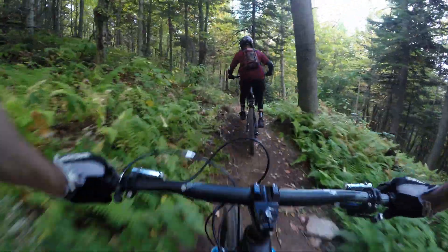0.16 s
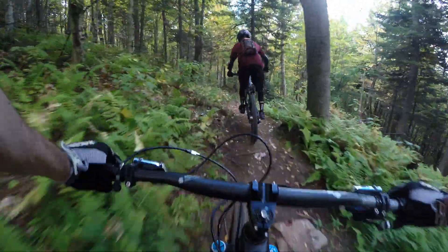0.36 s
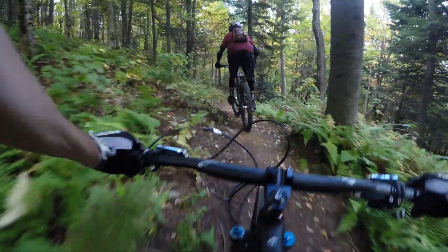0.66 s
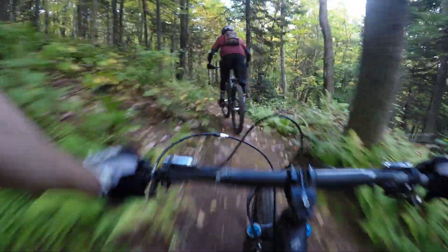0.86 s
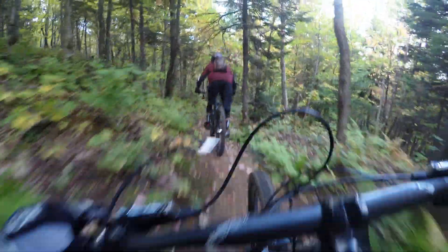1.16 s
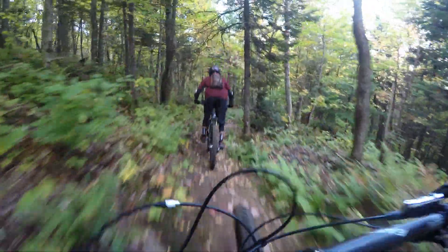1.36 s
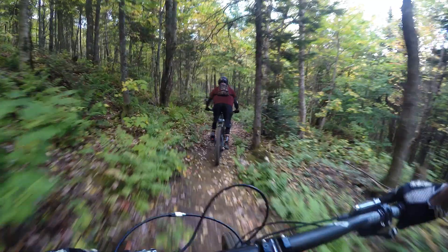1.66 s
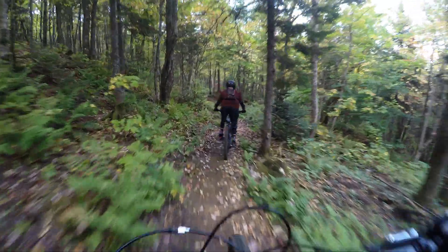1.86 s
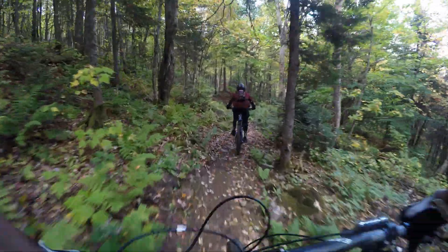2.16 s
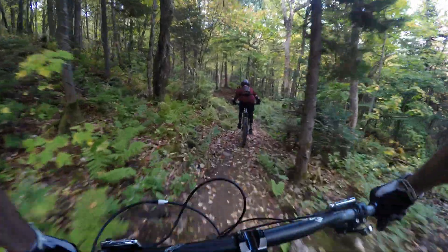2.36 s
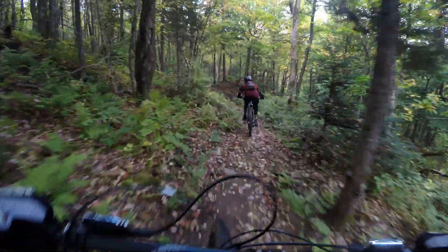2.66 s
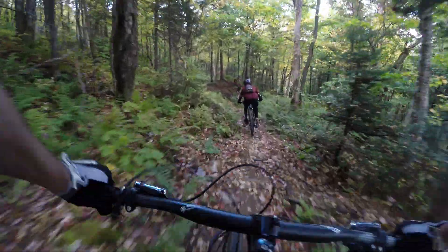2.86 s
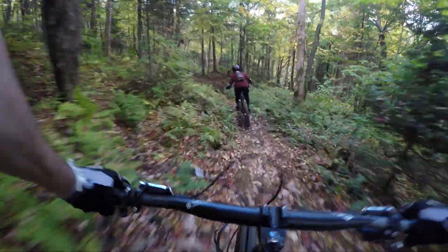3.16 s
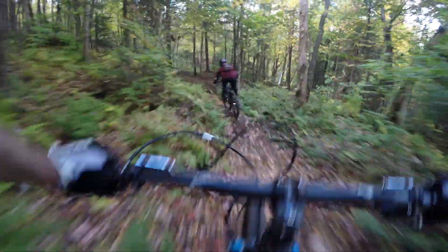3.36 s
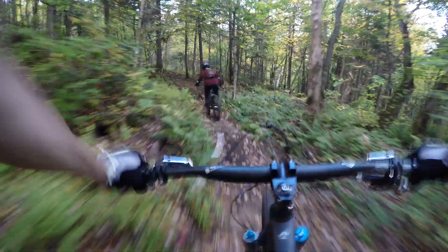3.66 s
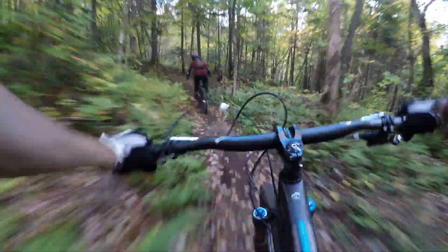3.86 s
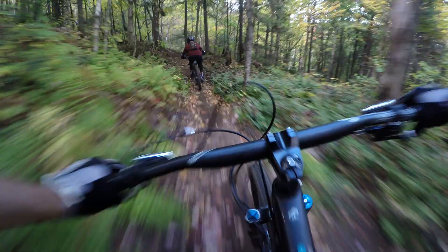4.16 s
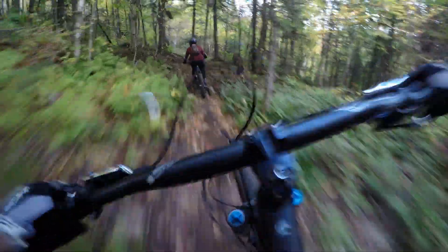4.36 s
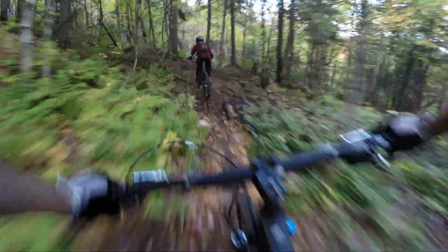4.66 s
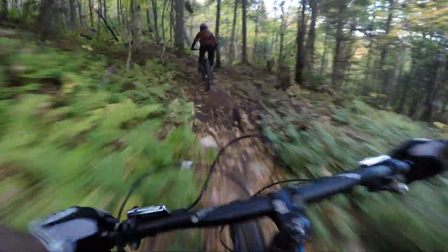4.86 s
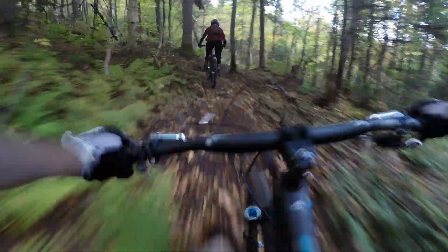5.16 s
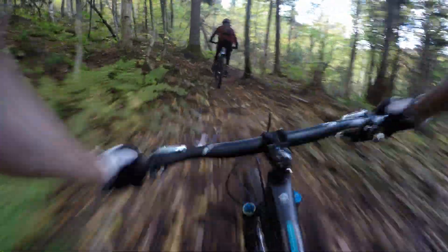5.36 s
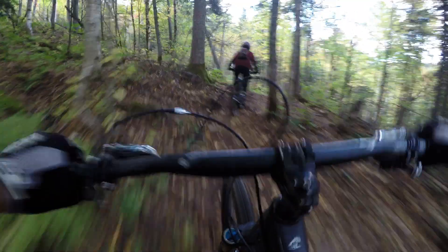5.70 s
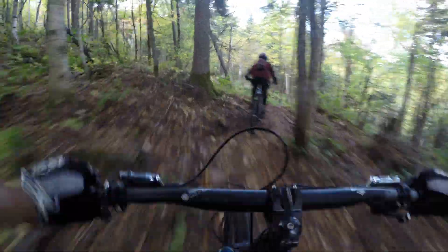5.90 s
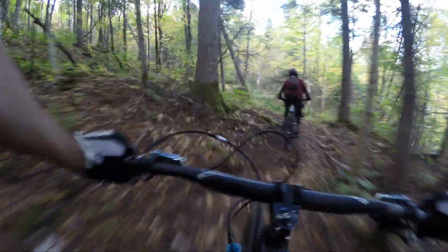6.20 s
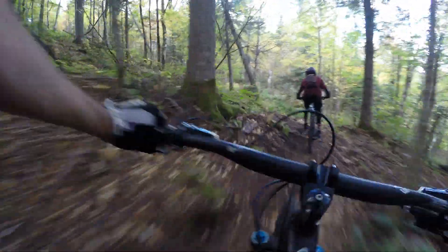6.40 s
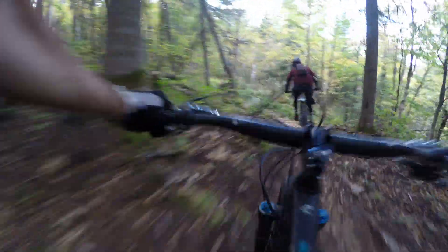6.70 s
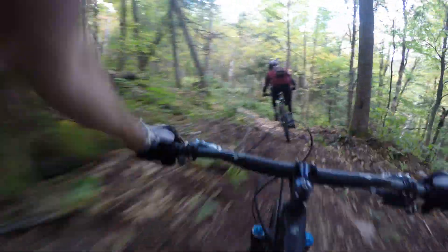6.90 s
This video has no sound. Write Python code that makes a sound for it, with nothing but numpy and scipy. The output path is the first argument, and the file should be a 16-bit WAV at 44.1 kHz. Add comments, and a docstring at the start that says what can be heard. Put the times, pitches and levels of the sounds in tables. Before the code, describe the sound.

A mountain bike rattles down a leafy dirt trail, tyres crunching and frame knocking, with wind and thumps on the microphone.

```python
"""On a leafy dirt trail, a mountain bike runs downhill, heard from a camera on the rider's chest.
The tyres crunch over grit and leaves, and rocks and roots knock the frame.
Jolts thump the camera and wind buffets its microphone. Chain, cables and pebbles tick,
and oil swishes through the damper (the shock absorber in the front fork) on deep strokes."""
import sys
import numpy as np
from scipy import signal
from scipy.fft import rfft, irfft, next_fast_len
from scipy.io import wavfile
from scipy.ndimage import uniform_filter1d, map_coordinates

SR = 44100
rng = np.random.default_rng(int(sys.argv[2]) if len(sys.argv) > 2 else 0)


def digitize_waveform(pressure):
    """Quantize a signal to 16-bit integers and store it at the path in sys.argv[1].

    Rows of a 2-D input are taken as channels; values are limited to [-1, 1].
    """
    field = np.atleast_2d(pressure).T
    bounded = np.clip(field, -1, 1)
    quanta = np.round(bounded * 32767).astype(np.int16)
    wavfile.write(sys.argv[1], SR, quanta)


N = 310464
HIGHEST_HZ = 15600
SCRAPE_S = .016  # a part scrapes for this long before it hits

# How hard the tyres work the ground. Each row: time in seconds, grit level in dB, leaf level in dB.
TYRE_LEVELS = [(0, -43, -55), (1.05, -43.5, -56), (1.25, -45.5, -59.5), (1.8, -44, -53),
               (2.5, -41.5, -51.5), (2.9, -42, -45), (3.47, -38, -49), (3.53, -31.5, -38.5),
               (3.9, -33, -45), (4.1, -25, -34), (4.15, -30.5, -42), (4.46, -36, -44.5), (4.87, -29.5, -39),
               (5.1, -35.5, -43.5), (5.27, -32.5, -45.5), (5.7, -38, -44.5), (6.22, -34.5, -42),
               (6.55, -40, -51), (7.04, -34, -49)]
# Patches of loose leaves and gravel. Each row: start in seconds, hold in seconds, leaf level in dB.
LOOSE_PATCHES = [(.155, 0.046, -46), (.355, .03, -50), (.855, 0.018, -48), (.93, 0.024, -47),
                 (1.355, 0.052, -48), (2.385, 0.038, -43.5), (2.67, 0.022, -44.5), (2.77, 0.077, -43.5),
                 (2.88, 0.034, -40.5), (3.25, 0.055, -42), (3.695, 0.068, -43), (3.945, 0.029, -34.5),
                 (4.075, 0.016, -38), (5.0, 0.036, -39.5), (5.235, 0.043, -35.5), (5.37, 0.035, -42),
                 (5.765, 0.041, -41), (5.87, 0.067, -42), (6.69, 0.053, -38), (6.94, 0.023, -39)]
# The tone of grit and of dry leaves. Each row: frequency in Hz, relative strength in dB.
GRIT_TONE = [(150, 11), (400, 7), (520, 6.5), (720, -1), (930, 0.5), (1250, 0), (1750, 0), (2300, -4),
             (3100, -2.5), (4900, -12.5), (6200, -13.5), (15000, -62)]
LEAF_TONE = [(1500, -32), (4000, 1.5), (6000, -5), (8000, -4), (10000, -5.5), (13000, -5.5), (15500, -16)]
# The notes that spokes and brake discs ring at. Each row: pitch in Hz, width in Hz, strength in dB.
WHEEL_NOTES = [(894, 22, 1.5), (966, 8.3, 15), (1406, 56, -10), (1742, 23, 11), (1890, 33, -2),
               (2650, 40, 9), (3080, 30, -11.5)]


def tyres():
    """Tyre knobs crush grit and dry leaves: a rush of small snaps that also sets the wheels ringing."""
    grit_db, leaves_db = curves(TYRE_LEVELS)
    patches = swells(LOOSE_PATCHES, rise_s=.0055, fall_s=.012)
    grit_gain = np.hypot(amp(grit_db), amp(3.5) * patches)  # patches stir up grit too
    leaf_gain = np.hypot(amp(leaves_db + .45 * wobble(35)), patches)
    bumps = amp(1.4 * wobble(45))
    clumps = amp(4.5 * wobble(140))  # one knob after another breaks something
    stones = unit(clumps * grains(per_s=1200, pitch_hz=2796, spread=.6, cycles=2.4, scatter_db=1))
    crackle = unit(clumps * grains(per_s=900, pitch_hz=8000, spread=.4, cycles=1.2, scatter_db=4))
    crunch = rng.standard_normal(N) + .5 * stones
    grit = patchy(coloured(crunch, GRIT_TONE), depth_db=2) * amp(1.3 * wobble(70))
    # A breaking leaf or stem gives a sharp snap that dies at once.
    breaks_per_s, break_fall_s = 110, .0015
    snaps = (rng.random(N) < breaks_per_s / SR) * rng.random(N) ** 2
    breaks = signal.lfilter([1], [1, -np.exp(-1 / (break_fall_s * SR))], snaps)
    rustle = rng.standard_normal(N) * (1 + amp(11.5) * breaks) + .7 * crackle
    leaves = patchy(coloured(rustle, LEAF_TONE), depth_db=2) * amp(1.2 * wobble(110))
    ringing = unit(filtered(crunch * amp(4 * wobble(35)), lambda f: body(WHEEL_NOTES, f)))
    ring_gain = amp(5.5) * grit_gain ** 1.49
    return bumps * (grit_gain * grit + leaf_gain * leaves + ring_gain * ringing)


# The notes that the frame rings at. Each row: pitch in Hz, width in Hz, strength in dB.
FRAME_NOTES = [(348, 120, 1), (476, 160, 10.5), (980, 480, 1.5), (1300, 300, -8.5), (1756, 460, 4),
               (2750, 510, 4), (3640, 600, 1), (4650, 760, 3)]
# Hits on rocks and roots. Each row: time in seconds, level in dB, brightness in Hz (higher is harder),
# breadth as a ratio (small sounds hollow), contact in seconds (long for a glancing blow).
TRAIL_HITS = [(0.348, -41, 1800, 1.1, .01), (0.595, -17.5, 1290, 1.7, 0.017),
              (0.731, -31.5, 2480, 1.6, 0.033), (0.937, -33.5, 1800, 1.9, 0.027),
              (1.08, -31.5, 2400, 0.74, .04), (1.359, -43, 3250, 0.032, 0.15),
              (1.559, -31, 2870, 0.3, 0.019), (2.17, -33, 3080, 0.13, .025), (2.908, -27, 1100, 0.52, .02),
              (2.936, -24, 800, 0.31, 0.008), (3.083, -26, 850, 0.5, 0.027),
              (3.209, -31, 2400, 0.68, 0.022), (3.232, -18.5, 1090, 0.29, 0.022),
              (3.388, -29, 3170, 0.18, 0.022), (3.403, -25, 750, 0.44, 0.015),
              (3.509, -16.5, 1970, 0.13, 0.0088), (3.533, -26.5, 3200, 1.4, .014),
              (3.609, -15, 2590, 0.83, 0.023), (3.706, -23, 1790, 1.3, 0.049),
              (3.852, -17.5, 646, 0.49, 0.026), (3.95, -19.5, 800, 0.49, 0.017),
              (3.963, -25, 2600, 0.98, 0.027), (3.994, -27.5, 3600, 1.3, 0.014),
              (4.025, -20.5, 1900, 0.85, .035), (4.037, -18, 2300, 1, 0.013),
              (4.05, -19.5, 2690, 0.98, 0.015), (4.077, -25.5, 3800, 0.51, 0.082),
              (4.112, -24.5, 2600, .4, 0.032), (4.13, -14.5, 2300, 0.85, 0.011),
              (4.194, -26.5, 2180, 0.39, 0.014), (4.301, -25.5, 2940, 1.1, 0.013),
              (4.849, -23, 2700, 1.6, 0.046), (5.229, -27.5, 2500, 1.1, .016),
              (5.266, -24, 2200, 0.67, 0.017), (5.389, -26, 2900, 0.93, 0.034),
              (5.572, -17, 3260, 1.4, 0.038), (5.576, -8.5, 680, 0.91, 0.0087),
              (5.617, -23, 2920, 1.8, 0.031), (5.656, -17, 1310, 0.61, 0.038),
              (5.672, -13, 2600, 1.9, 0.019), (5.678, -30, 3500, 1.1, 0.016), (6.043, -27, 1200, 1.3, .014),
              (6.159, -28.5, 2210, 0.22, 0.021), (6.181, -30, 2580, 1.1, .02),
              (6.228, -27.5, 1630, 0.35, 0.025)]


def frame_knocks():
    """Rocks and roots knock through the wheels into the frame: a hollow clack, then a dull shudder."""
    out, t = np.zeros(N), np.arange(SR // 3) / SR
    shudder_db, shudder_fade_s, shudder_top_hz = -19.5, .42, 450
    for start, db, top_hz, breadth, contact_s in TRAIL_HITS:
        tune = np.exp(.05 * rng.standard_normal())  # each knock has a slightly different pitch
        frame = lambda f: sum(amp(note_db) * resonance(f, tune * hz, width)
                              for hz, width, note_db in FRAME_NOTES)
        bike = lambda f: frame(f) + amp(-12) * body(WHEEL_NOTES, f)
        blow = 6 * .014 / contact_s  # a shorter contact gives a cleaner blow
        clack = strike(bike, top_hz, breadth, blow, contact_s, chatter_db=-14, chatter_s=.07)
        shudder = noise(len(t), lambda f: bike(f) / (1 + 1j * f / shudder_top_hz))
        add(out, start - SCRAPE_S, amp(db) * clack)
        add(out, start, amp(db + shudder_db) * fade(t, shudder_fade_s) * shudder)
    return out


# Jolts to the camera. Each row: start in seconds, swing level in dB, slap in dB relative to the swing.
CAMERA_JOLTS = [(0.262, -17.5, -12), (0.295, -12.5, -26), (0.342, -12, -20), (0.505, -9, -40),
                (0.524, -3, -33), (0.61, -4.5, -17.5), (0.924, -10.5, -17), (0.975, -6.5, -43),
                (1.15, -11, -35), (1.308, -2, -30), (1.847, -10, -40), (2.199, -1, -18.5),
                (2.436, -4.5, -8.5), (2.543, -8, -5.5), (2.562, -4.5, -10), (2.641, -3.5, -9),
                (2.818, -1.5, -29), (3.079, -7, -4.5), (3.123, -2.5, -7.5), (3.155, -2, -11.5),
                (3.267, -8, -8), (3.427, -5.5, -13), (3.651, -2.5, -7), (3.822, -10.5, -2),
                (3.935, -8, -2.5), (4.124, -1.5, -1), (4.525, -16, -4), (4.591, -0.5, -23),
                (4.798, -5.5, -7), (4.837, -4.5, -4.5), (4.873, -13, 5), (4.913, -7.5, -3), (5.265, -6, -2),
                (5.287, -2.5, -9.5), (5.576, -8, 1.5), (5.794, -13, -11), (5.879, -2, -13.5),
                (5.926, -4.5, -21), (6.023, -8.5, -16), (6.055, -2, -19), (6.114, -3.5, -13),
                (6.227, -6.5, -11.5), (6.258, -6.5, -12.5), (6.35, -3, -17), (6.411, -1, -8.5),
                (6.616, 0, -10), (6.802, -2, -12.5)]


def camera_jolts():
    """Each jolt swings the camera on its strap: a deep, short thump that starts with a dull slap."""
    out, t = np.zeros(N), np.arange(SR // 6) / SR
    swing_hz = 44.1
    swing = np.sin(2 * np.pi * swing_hz * t) * fade(t, seconds=.12)
    for start, db, slap_db in CAMERA_JOLTS:
        slap_hz = max(237.6 + 8 * slap_db, swing_hz)  # a harder slap sounds higher
        rub = rng.standard_normal(len(t)) * fade(t, seconds=.039)
        slap = filtered(rub, lambda f: resonance(f, slap_hz, 1.4 * slap_hz) ** 3)
        add(out, start, amp(db) * (swing + amp(slap_db) * slap / np.abs(slap).max()))
    return out


# Air and body shake, growing as the bike gathers speed. Each row: time in seconds, level in dB.
RUMBLE_LEVELS = [(0, -32.5), (.55, -25.5), (.8, -24), (.95, -23), (1.42, -25), (1.78, -28), (2.3, -20),
                 (2.75, -22.5), (3.15, -9.5), (3.52, -21.5), (3.7, -13), (4.4, -15.5), (4.9, -14),
                 (5.05, -20.5), (5.35, -14), (5.7, -19), (6.25, -18), (6.52, -18), (7.04, -14.5)]
# Gusts that break over the microphone. Each row: start in seconds, hold in seconds, level in dB.
WIND_GUSTS = [(.92, 0.041, -32.5), (2.2, 0.064, -42), (2.54, 0.044, -39), (2.895, 0.081, -16.5),
              (3.01, 0.025, -27.5), (3.195, 0.097, -20), (3.33, 0.0089, -23), (3.385, 0.068, -19),
              (3.61, 0.039, -19.5), (3.82, 0.063, -19), (3.9, 0.071, -25.5), (4.025, 0.12, -22),
              (4.205, 0.0051, -23), (4.825, 0.068, -20), (5.26, 0.037, -22.5), (5.565, 0.019, -19),
              (5.635, 0.042, -25.5), (5.775, 0.076, -37), (5.87, 0.038, -32), (6.02, 0.027, -30.5),
              (6.116, 0.012, -19), (6.19, 0.053, -30), (6.355, 0.083, -21.5), (7.005, 0.048, -25)]
# The tone of the wind's three layers. Each row: frequency in Hz, relative strength in dB.
SHAKE_TONE = [(8, -27), (20, -1.5), (29, 3), (50, -2.5), (80, -7.5), (120, -18.5), (200, -30), (400, -49),
              (1000, -120)]
SWIRL_TONE = [(50, -13), (100, -2), (150, -2.5), (240, 2), (350, -4.5), (500, -13.5), (700, -22),
              (1100, -38.5), (2500, -37.5), (8000, -55)]
ROAR_TONE = [(40, -2), (90, 19), (150, 16.5), (240, 1), (420, 0), (620, -2.5), (900, -21), (1600, -52),
             (5000, -80)]


def wind():
    """Air buffets the microphone: a deep shake, lumpy swirls and a rough roar in strong gusts."""
    rumble_db, = curves(RUMBLE_LEVELS)
    breeze = amp(1.124 * rumble_db - 17 + 1.7 * wobble(19))
    gusts = swells(WIND_GUSTS, rise_s=.0075, fall_s=.012)
    shake = steadied(coloured(rng.standard_normal(N), SHAKE_TONE), seconds=.0513)
    swirls = coloured(rng.standard_normal(N) * amp(5.1 * wobble(110)), SWIRL_TONE)
    swirls = steadied(swirls, seconds=.071)
    roar = coloured(rng.standard_normal(N) * amp(5.5 * wobble(130)), ROAR_TONE)
    roar = steadied(roar, seconds=.04)
    roar_gain = np.minimum(amp(8) * gusts ** 1.407, amp(-12))  # outgrows the gust, up to a ceiling
    sway = amp(2.8 * wobble(17) - 1.5)
    shake_gain = np.hypot(sway * amp(rumble_db), amp(-1.5) * gusts)
    return shake_gain * shake + np.hypot(breeze, gusts) * swirls + roar_gain * roar


# The notes of the chain and small metal parts. Each row: pitch in Hz, width in Hz, strength in dB.
METAL_NOTES = [(2170, 2070, -3), (3230, 680, 5.5), (3593, 470, 5), (4780, 1220, 2), (6430, 3800, -3.5),
               (9300, 2160, 0), (12900, 3200, -1.5)]
# The clearest ticks. Each row: time in seconds, level in dB, brightness in Hz,
# contact in seconds (short for a snap, long for a rattle).
CLEAR_TICKS = [(0.057, -36.5, 10700, 0.019), (0.372, -37, 8350, 0.022), (0.449, -38, 8050, 0.032),
               (0.532, -43.5, 10500, .015), (0.596, -37, 7300, 0.024), (0.948, -34, 5860, 0.032),
               (0.999, -33.5, 6300, 0.047), (1.198, -37, 5400, 0.039), (1.682, -36.5, 7500, 0.045),
               (1.92, -36, 5000, 0.037), (2.02, -35.5, 6000, 0.086), (2.594, -34.5, 6150, 0.053),
               (2.729, -40, 6500, 0.01), (3.012, -36.5, 4500, 0.012), (3.126, -37, 7000, .012),
               (3.253, -35, 7400, 0.018), (3.327, -34.5, 4500, 0.016), (3.534, -31, 7500, .012),
               (3.609, -36, 10000, .005), (3.714, -24, 6600, 0.025), (3.718, -26.5, 5800, 0.025),
               (3.793, -28.5, 7100, 0.0066), (3.869, -27, 5200, 0.032), (3.908, -28.5, 11000, 0.0088),
               (3.962, -29, 7300, 0.015), (4.083, -26, 8000, 0.0055), (4.095, -23.5, 7450, .012),
               (4.302, -27, 5770, 0.036), (4.512, -30.5, 6800, 0.015), (4.58, -29.5, 4500, 0.013),
               (4.616, -31, 7500, .006), (4.626, -22, 4000, 0.041), (4.765, -25.5, 5900, 0.049),
               (5.063, -36, 5000, 0.0098), (5.183, -27, 5040, 0.029), (5.369, -32.5, 9000, .005),
               (5.412, -23.5, 10500, 0.0062), (5.475, -31.5, 8160, 0.0074), (5.512, -32, 5000, 0.017),
               (5.573, -24.5, 6450, 0.035), (5.595, -32, 4000, .15), (5.882, -30, 6000, .01),
               (5.914, -33, 9000, 0.006), (5.927, -36, 14000, .003), (5.938, -37, 7460, .006),
               (5.994, -25.5, 11700, 0.0062), (6.043, -29.5, 7500, 0.022), (6.132, -27.5, 5630, 0.022),
               (6.215, -29, 10000, 0.016), (6.331, -29.5, 8500, 0.023), (6.735, -32.5, 7550, .008),
               (6.834, -33, 5840, 0.01), (6.912, -37, 10000, .01), (6.941, -39, 9000, .008),
               (6.95, -32.5, 8000, .01)]


def metal_ticks():
    """Chain, cables and flung pebbles tick against the bike's metal parts."""
    out = np.zeros(N)
    for start, db, top_hz, contact_s in CLEAR_TICKS:
        tick = strike(lambda f: body(METAL_NOTES, f), top_hz, breadth=1.4, blow=2.5,
                      contact_s=contact_s, chatter_db=-17, chatter_s=.06)
        add(out, start - SCRAPE_S, amp(db) * tick)
    return out


def light_rattle():
    """Small metal parts keep tapping and pinging, louder where the ground is rougher."""
    out, taps_per_s = np.zeros(N), 24
    grit_db, _ = curves(TYRE_LEVELS)
    count = int(taps_per_s * N / SR)
    starts = ((np.arange(count) + rng.random(count)) * N / count).astype(int)
    for i, (force, hardness) in zip(starts, rng.standard_normal((count, 2))):
        gain = amp(.92 * grit_db[i] - 10 + 2 * force)
        top_hz = 6500 * np.exp(.3 * hardness)
        tap = strike(lambda f: body(METAL_NOTES, f), top_hz, breadth=.8, blow=2.5,
                     contact_s=.008, chatter_db=-16, chatter_s=.06)
        add(out, i / SR - SCRAPE_S, gain * tap)
        add(out, i / SR, gain * amp(-3.5) * ping(count=4, pitch_hz=4570, rise_s=.00095, fade_s=.038))
    return out


# Deep strokes of the fork. Each row: middle in seconds, level in dB, about half the length in seconds,
# whistle pitch in Hz, how fast that pitch falls in Hz per second.
FORK_STROKES = [(3.698, -35.5, 0.0085, 5140, 8000), (3.771, -33, 0.014, 5020, 3000),
                (4.483, -38, 0.0069, 4960, 20000), (5.16, -38.5, 0.0087, 4300, 20000),
                (5.171, -39, 0.0088, 3560, 3000), (5.357, -36.5, 0.006, 5030, 15000),
                (5.874, -30.5, 0.004, 3350, 3000), (5.885, -29.5, 0.0035, 4960, 10000),
                (5.896, -33.5, 0.006, 4400, 40000), (6.698, -37.5, 0.014, 5070, 12000)]


def fork_damper():
    """Oil forced through the damper hisses, with a whistle that sinks as each stroke slows."""
    out, t = np.zeros(N), np.arange(-SR // 10, SR // 10) / SR
    for middle, db, half_s, hz, fall_hz_per_s in FORK_STROKES:
        hiss = noise(len(t), lambda f: resonance(f, hz, .4 * hz) * resonance(f, hz, 3 * hz))
        flutter = noise(len(t), lambda f: np.exp(-(f / 190) ** 2))
        phase = 2 * np.pi * (hz * t - .5 * fall_hz_per_s * t ** 2)
        overtone = amp(-10) * np.cos(1.55 * phase)
        whistle = unit(flutter * (np.cos(phase) + overtone))
        swell = np.exp(-.5 * (t / half_s) ** 2)
        add(out, middle + t[0], amp(db) * swell * (hiss + amp(2.5) * whistle))
    return out


def strike(ring, top_hz, breadth, blow, contact_s, chatter_db, chatter_s):
    """A scrape, a hard blow, a rough contact and a little chatter make a part ring."""
    lead = round(SCRAPE_S * SR)
    t = np.arange(-lead, SR // 10) / SR
    touches = rng.standard_normal(len(t)) * (rng.random(len(t)) < .2)
    scrape = amp(-10) * np.exp(-np.abs(t) / (.19 * contact_s))
    settle = fade(np.abs(t), contact_s) + amp(chatter_db) * fade(np.abs(t), chatter_s)
    force = touches * np.where(t < 0, scrape, settle)
    force[lead + SR // 2000] += blow
    # A softer contact has a lower top_hz, so it loses more treble.
    band = lambda f: resonance(f, .43 * top_hz, breadth * top_hz)
    treble_cut = lambda f: 1 / (1 + 1.2j * f / top_hz - (f / top_hz) ** 2)
    sound = filtered(force, lambda f: ring(f) * band(f) * treble_cut(f))
    attack = sound[lead:lead + round(.008 * SR)]  # the first 8 ms of the hit set its level
    return sound / np.sqrt(np.mean(attack ** 2))


def ping(count, pitch_hz, rise_s, fade_s):
    """Thin metal rings briefly at a few random pitches around pitch_hz."""
    t = np.arange(SR // 12) / SR
    hz = pitch_hz * np.exp(.36 * rng.standard_normal((count, 1)))
    return np.sin(2 * np.pi * hz * t).sum(0) * fade(t, fade_s) * (1 - np.exp(-t / rise_s))


def grains(per_s, pitch_hz, spread, cycles, scatter_db):
    """Tiny snaps at random times: most are weak, a few stand out."""
    count = int(per_s * N / SR)
    starts, samples = rng.integers(0, N, count), np.arange(160)
    hz = np.clip(pitch_hz * np.exp(spread * rng.standard_normal((count, 1))), 200, HIGHEST_HZ)
    size = amp(scatter_db * np.minimum(rng.exponential(size=(count, 1)), 4))
    turns = hz * samples / SR
    snaps = size * np.sin(2 * np.pi * turns) * np.exp(-turns / cycles)
    return unit(np.bincount((starts[:, None] + samples).ravel(), snaps.ravel(), minlength=N)[:N])


def patchy(x, depth_db):
    """Every stone and leaf has its own tone, so bands of pitch briefly swell and fade."""
    spectrum = signal.stft(x, nperseg=256)[2]
    across_pitch = uniform_filter1d(rng.standard_normal(spectrum.shape), 3, axis=0)
    flicker = unit(uniform_filter1d(across_pitch, 9, axis=1))
    return unit(signal.istft(spectrum * amp(depth_db * flicker), nperseg=256)[1][:len(x)])


def resonance(f, centre, width):
    """How one ringing note responds at frequencies f; a narrow one rings longer."""
    return 1j * f * width / (centre ** 2 - f ** 2 + 1j * f * width)


def body(notes, f):
    """How a part with several ringing notes responds at frequencies f."""
    return sum((-1) ** k * amp(db) * resonance(f, hz, width) for k, (hz, width, db) in enumerate(notes))


def swells(rows, rise_s, fall_s):
    """A volume curve for events that each rise, hold and die away."""
    t, gain = np.arange(N) / SR, np.zeros(N)
    for start, hold_s, db in rows:
        before = np.maximum((start - t) / rise_s, 0)
        after = np.maximum((t - start - hold_s) / fall_s, 0)
        gain = np.maximum(gain, amp(db) * np.exp(-np.minimum(before + after, 20)))
    return gain


def curves(rows):
    """Join timed rows with straight lines: one curve for each column after the time."""
    times, *columns = np.transpose(rows)
    return [np.interp(np.arange(N) / SR, times, column) for column in columns]


def wobble(per_s):
    """A smooth curve through per_s random points a second."""
    points = rng.standard_normal(int(N * per_s / SR) + 4)
    return map_coordinates(points, [np.arange(N) * per_s / SR])


def filtered(x, response):
    """Pass x through a filter, given as a function of frequency."""
    size = next_fast_len(len(x) + 8192)
    return irfft(rfft(x, size) * response(np.fft.rfftfreq(size, 1 / SR)), size)[:len(x)]


def noise(length, response):
    """Filtered noise at an average level of 1."""
    return unit(filtered(rng.standard_normal(length), response))


def coloured(x, tone):
    """Shape x with a tone table, at an average level of 1."""
    hz, db = np.transpose(tone)
    return unit(filtered(x, lambda f: amp(np.interp(np.log(f + 1), np.log(hz), db))))


def steadied(x, seconds):
    """Even out swells that are slower than the given time."""
    power = np.abs(uniform_filter1d(x ** 2, max(int(seconds * SR), 1)))
    return x / np.sqrt(power + 1e-3)


def fade(t, seconds):
    """Die away by 60 dB in the given time."""
    return amp(-60 * t / seconds)


def amp(db):
    """Turn decibels into a multiplier."""
    return 10 ** (np.asarray(db) / 20)


def unit(x):
    """Scale to an average (rms) level of 1."""
    return x / np.sqrt(np.mean(x ** 2) + 1e-20)


def add(track, start_s, sound):
    """Mix a sound into the track."""
    part = track[max(round(start_s * SR), 0):][:len(sound)]
    part += sound[:len(part)]


def scene():
    """Everything is close to the microphone, in one channel with no echo."""
    mix = wind() + camera_jolts() + tyres() + frame_knocks()
    mix += metal_ticks() + light_rattle() + fork_damper()
    return mix[None]


def record(dry):
    """The camera blocks the slowest pressure swings, rounds off peaks and cuts the highest treble."""
    low_cut_hz, ceiling = 9, .95
    sound = filtered(dry[0], lambda f: 1j * f / (1j * f + low_cut_hz))
    rounded = sound / (1 + np.abs(sound / ceiling) ** 6) ** (1 / 6)
    return filtered(rounded, lambda f: 1 / (1 + (f / HIGHEST_HZ) ** 120))[None]


dry = scene()
out = record(dry)
digitize_waveform(out)
```